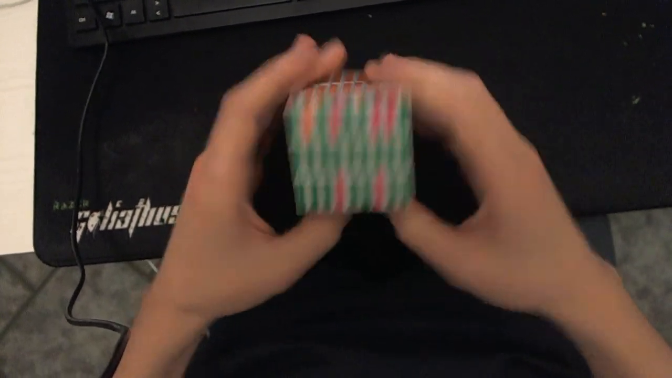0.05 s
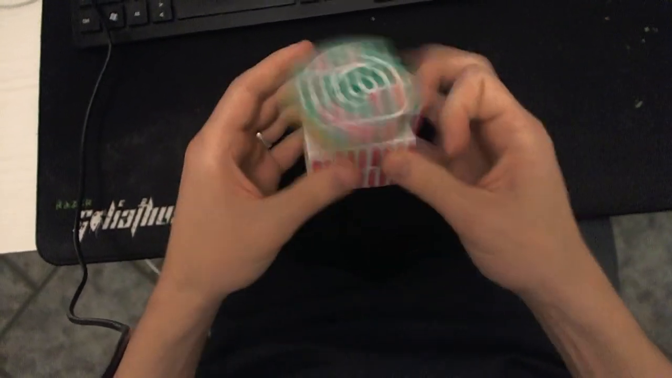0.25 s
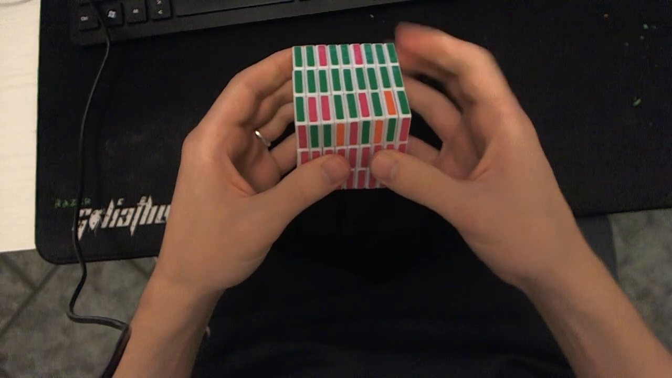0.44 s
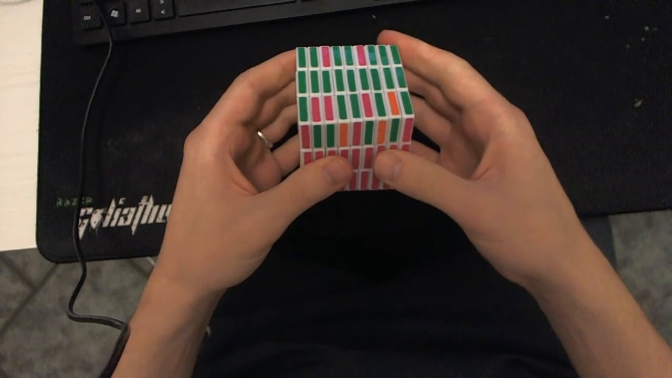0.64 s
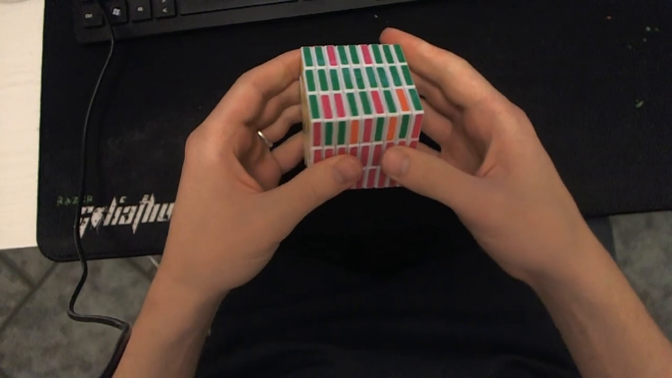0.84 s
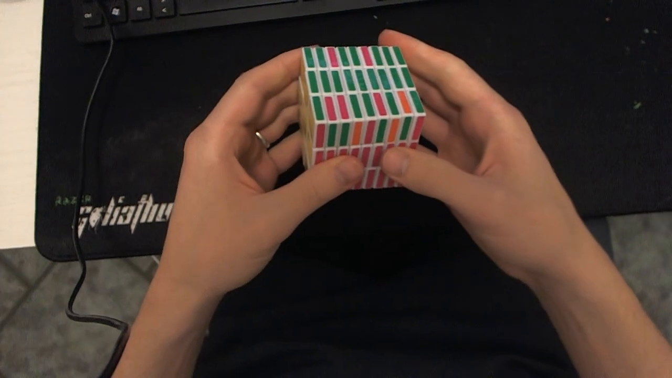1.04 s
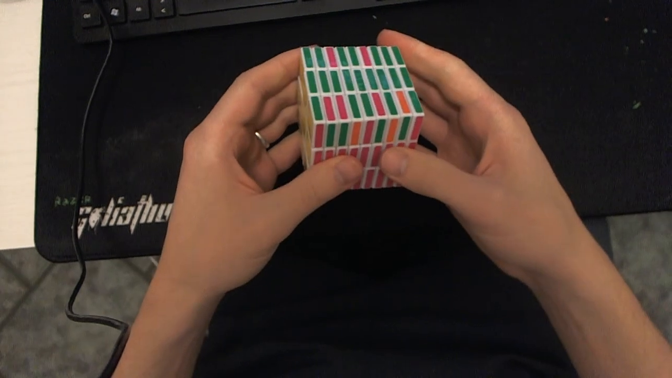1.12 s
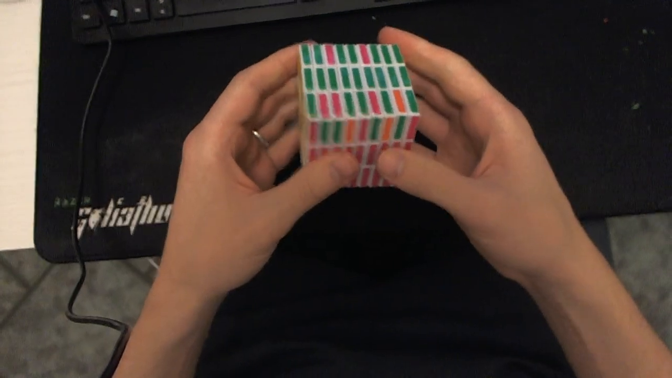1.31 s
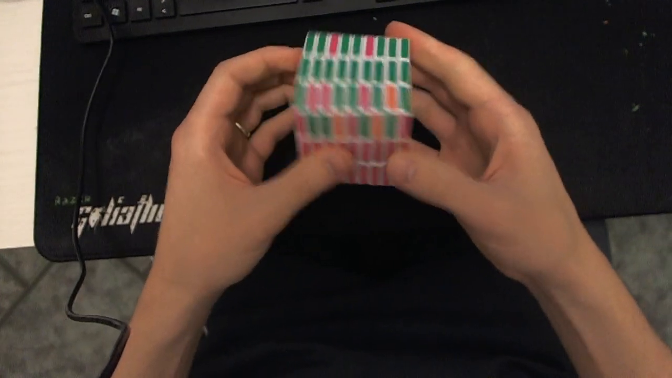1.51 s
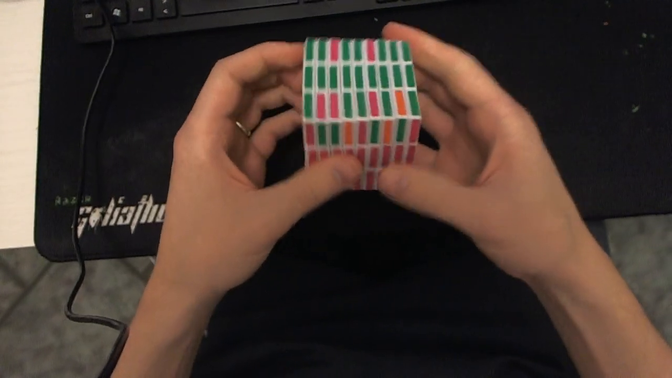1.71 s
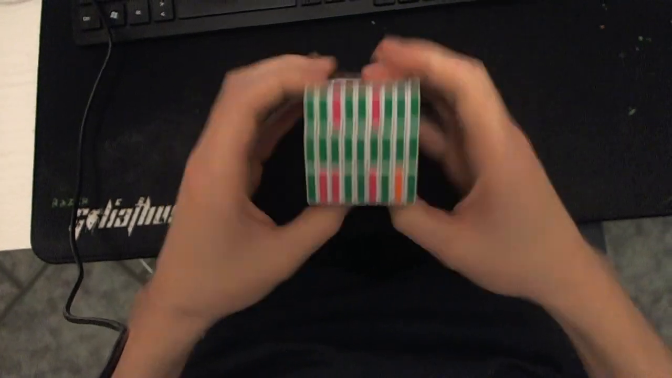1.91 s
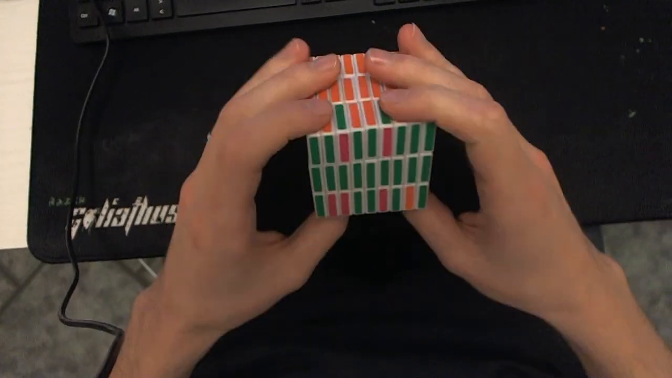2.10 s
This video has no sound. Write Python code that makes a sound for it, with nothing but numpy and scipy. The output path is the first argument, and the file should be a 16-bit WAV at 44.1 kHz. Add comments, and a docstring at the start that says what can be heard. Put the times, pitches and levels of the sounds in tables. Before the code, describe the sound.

A plastic twisty puzzle layer is flicked round with a loud clatter, then light ticks follow

```python
"""In a quiet room, a plastic twisty puzzle is turned by hand close to a pair of microphones in one place.
One layer is flicked round with a loud clatter of knocks, rattle and a low drone; then the pieces tick and rub
in two light runs as the puzzle is tipped and gripped again. A computer hums faintly behind.
Contacts are damped noise with a ring, rubbing is a shower of tiny slips, the computer is noise and sines;
a short room, a noise suppressor and a limiter follow."""
import sys
import numpy as np
from scipy import signal
from scipy.fft import rfft, irfft
from scipy.io import wavfile
from scipy.ndimage import uniform_filter1d, minimum_filter1d

SR = 44100
rng = np.random.default_rng(int(sys.argv[2]) if len(sys.argv) > 2 else 0)


def output_pcm(signal):
    """Save a mono or channel-first signal as 16-bit PCM at the path in sys.argv[1].

    Samples are clipped to [-1, 1] before scaling.
    """
    pcm = np.clip(np.atleast_2d(signal).T, -1, 1) * 32767
    wavfile.write(sys.argv[1], SR, np.round(pcm).astype(np.int16))


N = 97020

# All source levels are taken ahead of the suppressor and limiter.
LIKENESS = 1  # of left and right in the puzzle's own sounds: 1 is identical
CLICK_DB, CLACK_DB = -1.31, -1  # trims of the light ticks and of the turn's knocks
CLICK_DECAY_S, CLACK_DECAY_S, RISE_S = 0.0013, 0.0012, 0.00042  # time constants
CONTACT_PEAK_DB = 4.5  # each contact favours the band around its ring pitch
RING_DB, RING_CYCLES = -3.5, 3.6  # ring against crowd; cycles in which it falls to 1/e
HARD_DB, RING_GROWTH = -10, 0.7  # knocks above HARD_DB ring more: dB for each dB of strength
RATTLE_PER_S, RATTLE_SPREAD_DB = 850, 5.5  # mean rate of slips and spread of their sizes
SCRAPE_PEAK_DB, PEAK_OCTAVES = 11, 0.44  # pitch peak of a scrape; width of every peak
THUMP_S, THUMP_HZ, THUMP_DECAY_S, THUMP_DB = 0.2628, 350, 0.0018, -34.5
ROOM_DB, EARLY_DB = -16.5, -14  # energy of the tail and of the early cluster against a direct sound
EARLY_PEAK_S, EARLY_END_S = 0.0039, 0.033  # the early cluster is strongest, then begins its last drop
AIR_DB = -64.5
SUPPRESS_DB, OPEN_DB = 4.5, 19  # deepest cut; rise over the floor at which nothing is cut
CEILING, CUT_HZ = 0.88, 15800  # full scale is 1


def amp(db):
    """Turns decibels into an amplitude factor."""
    return 10 ** (np.asarray(db) / 20)


def evened(x):
    """Scales to rms 1."""
    return x / np.sqrt(np.mean(x ** 2) + 1e-20)


def read(points, hz):
    """Reads a table on a log-frequency axis."""
    f, value = np.transpose(points)
    return np.interp(np.log(hz + 1), np.log(f + 1), value)


def bump(hz, centre_hz):
    """A broad resonance of height 1 on a log-frequency axis."""
    return np.exp(-(np.log2((hz + 1) / centre_hz) / PEAK_OCTAVES) ** 2)


def add(mix, s, sound):
    """Mixes a stereo sound in at time s."""
    part = mix[:, max(round(s * SR), 0):][:, :sound.shape[1]]
    part += sound[:, :part.shape[1]]


def pair(a, b, likeness):
    """Two channels share a and take b with opposite signs, less of it the more alike they are."""
    c = np.clip(likeness, 0, 1)
    return np.sqrt((1 + c) / 2) * a + np.sqrt((1 - c) / 2) * np.array([b, -b])


def causal(db):
    """The sharpest causal (minimum-phase) pulse with these gains, faded out at its end."""
    log_gain = np.log(amp(np.concatenate([db, db[-2:0:-1]])))
    pulse = irfft(np.exp(np.conj(signal.hilbert(log_gain)))[:len(db)])
    return pulse * np.hanning(2 * len(pulse))[len(pulse):]


def background(likeness=0.81, waver_hz=2.0):
    """Computer: shaped noise for the fan air, and sines whose pitch wavers slowly for the hum."""
    # fan air: hz, gain_db
    air_colour = [(25, -30.5), (60, -21), (100, -7), (170, -1.5), (300, -3), (700, -5.5), (1000, -2),
                  (1400, -10.5), (2600, -12.5), (3500, -20), (5200, -19), (7500, -28), (11000, -30),
                  (15500, -41.5)]
    # hum partials: pitch_hz, rms level_db
    hum_partials = [(128, -67.5), (256, -78.5), (512, -75.5), (1020, -76)]
    noise = pair(*rng.standard_normal((2, N)), likeness)
    air_gain = amp(read(air_colour, np.fft.rfftfreq(N, 1 / SR)))
    out = amp(AIR_DB) * evened(irfft(rfft(noise) * air_gain, N))
    for hz, db in hum_partials:
        wander = evened(uniform_filter1d(rng.standard_normal(N), size=4000))
        # higher partials waver by more hertz
        drift_hz = waver_hz * np.sqrt(hz / hum_partials[0][0]) * wander
        phase = 2 * np.pi * np.cumsum(hz + drift_hz) / SR
        out = out + amp(db) * np.sqrt(2) * np.sin(phase)
    return out


def rattle(force, colour, peak_hz=1000, peak_db=0, size=2048):
    """Tiny random slips of plastic on plastic, as strong as the force, favouring one pitch."""
    spread = amp(RATTLE_SPREAD_DB * np.minimum(rng.exponential(1, N), 2))
    sizes = spread * (rng.random(N) < RATTLE_PER_S / SR)
    slips = pair(rng.choice([-1., 1.], N), rng.standard_normal(N), LIKENESS) * sizes
    hz = np.fft.rfftfreq(size, 1 / SR)
    pulse = causal(read(colour, hz) + peak_db * bump(hz, peak_hz))
    pulse = pulse[None] / np.linalg.norm(pulse)
    return signal.oaconvolve(evened(slips) * force, pulse, axes=1)[:, :N]


def contact(row, colour, decay_s, size=2048):
    """A piece is struck: a crowd of heavily damped modes, and one that stands out and rings."""
    # weight of a contact's body over frequency: hz, share
    body_share = [(700, 0.12), (1500, 0.99), (3000, 0)]
    # weight of its bright edge over frequency: hz, share
    edge_share = [(5500, 0.031), (8500, 0.98)]
    level_db, ring_hz, body_db, edge_db = row
    t, hz = np.arange(size) / SR, np.fft.rfftfreq(size, 1 / SR)
    rise = 1 - np.exp(-t / RISE_S)

    crowd = pair(*rng.standard_normal((2, size)), LIKENESS) * rise * np.exp(-t / decay_s)
    # the noise's own uneven spectrum is taken out, so that the colour holds
    lumps_db = 10 * np.log10(uniform_filter1d((abs(rfft(crowd)) ** 2).mean(0), size=61))
    gain_db = read(colour, hz) + body_db * read(body_share, hz) + edge_db * read(edge_share, hz)
    pulse = causal(gain_db + CONTACT_PEAK_DB * bump(hz, ring_hz) - lumps_db)
    crowd = signal.fftconvolve(crowd, pulse[None], axes=1)[:, :size]

    tone = np.sin(2 * np.pi * (ring_hz * t + rng.random()))
    motion = rise ** 3 * np.exp(-t * ring_hz / RING_CYCLES) * tone
    ring = np.gradient(np.gradient(motion))  # acceleration of the surface
    ring_db = RING_DB + RING_GROWTH * max(level_db - HARD_DB, 0)

    # the level is that of the whole energy packed into one millisecond
    millisecond = np.sqrt(SR / 1000 / size)
    return evened(evened(crowd) + amp(ring_db) * evened(ring)) * millisecond * amp(level_db)


def contacts(table, colour, decay_s):
    """Plays a table of contacts, each struck at its own time."""
    out = np.zeros((2, N))
    for s, *row in table:
        add(out, s, contact(row, colour, decay_s))
    return out


def handling():
    """Loose pieces tick and rub as the grip changes; each rub swells and fades as a half ellipse."""
    # pieces rubbing under the fingers: start_s, length_s, peak level_db, scrape pitch_hz
    rubs = [(.0, 0.057, -63, 4500), (0.052, 0.023, -54.5, 4600), (0.097, 0.019, -57, 6800),
            (0.46, 0.039, -63.5, 1510), (1.324, 0.043, -51, 3400), (1.366, 0.076, -57.5, 2757),
            (1.45, 0.0463, -54.5, 2540), (1.536, 0.0204, -61, 2470), (1.781, 0.027, -58, 2700),
            (1.872, 0.058, -49.5, 2570), (1.969, 0.059, -62, 6500), (2.134, 0.0321, -65, 4600)]
    # light ticks of single pieces: start_s, level_db before CLICK_DB, ring pitch_hz, body_db, edge_db
    ticks = [(0.0628, -34.5, 4040, -4, 4.5), (0.0662, -33.5, 4220, -6, -1.5), (0.1037, -50, 6260, 8, -2),
             (0.1084, -46.5, 2580, 9, -11), (0.1508, -42, 6910, 5, -30), (0.4335, -33.5, 10560, 3, 16),
             (0.4781, -42, 1487, 9, 9), (0.533, -43.5, 7893, 0.5, 17), (0.5886, -50, 4154, 10.5, -9),
             (1.3358, -36, 5990, -8, 9), (1.3398, -38.5, 6550, 8, -6.5), (1.3457, -34.5, 3020, 3, 0.5),
             (1.3521, -31, 3620, 0, -2), (1.3703, -43.5, 3420, -2.5, 0), (1.3741, -29, 6200, -6, 7.5),
             (1.3955, -31, 5800, -13, -2), (1.3979, -32, 5990, -6, 5), (1.417, -31, 3940, -3, -3),
             (1.4292, -57, 3990, 5, 4), (1.4562, -34.5, 8990, -10, 6), (1.4603, -40, 5500, 2, 2),
             (1.4723, -35, 3650, 3, 13.5), (1.4748, -35, 2585, -4, -3), (1.499, -49, 4940, 10, 11),
             (1.5428, -45, 1550, 9.5, -8.5), (1.7874, -38.5, 6240, 7, -2), (1.8514, -43.5, 6400, 7, 6),
             (1.8593, -26, 8220, -7.5, -3), (1.8618, -27.5, 4490, -13.5, 5), (1.8906, -34, 7560, 6.5, 4),
             (1.8925, -38, 3080, 1, -3), (1.9005, -38, 3204, 3, -19), (1.9062, -43, 7000, -1, 5),
             (1.9101, -39.5, 2365, -4, 6), (1.9215, -52, 2870, -1, -11), (1.9296, -39.5, 5450, -8, 1),
             (1.9623, -34.5, 4200, -29, 17), (1.9686, -30.5, 6090, -6, 11.5),
             (2.0195, -40.5, 7470, -2.5, 12), (2.1358, -47.5, 4570, 0.5, -1.5), (2.1515, -40, 4480, -17, 2)]
    # colour of ticks and rubs: hz, gain_db
    tick_colour = [(60, -69.5), (300, -38.5), (700, -24.5), (1300, 0), (2000, -3.5), (2700, -2), (6000, -1),
                   (9500, -9.5), (12500, -26.5), (15500, -52.5)]
    t = np.arange(N) / SR
    out = amp(CLICK_DB) * contacts(ticks, tick_colour, CLICK_DECAY_S)
    for s, length, db, hz in rubs:
        across = 2 * (t - s) / length - 1  # -1 to 1 over the rub
        force = amp(db) * np.sqrt(np.maximum(1 - across ** 2, 0))
        out += rattle(force, tick_colour, hz, SCRAPE_PEAK_DB)
    return out


def fast_turn():
    """The spinning layer knocks and rattles; the hollow puzzle drones under it and thumps once."""
    # force of the turn, as the level of its fine rattle: time_s, level_db
    turn_force = [(0.142, -70), (0.167, -45.5), (.19, -46), (.216, -45.5), (.236, -24.5), (0.267, -18.5),
                  (.281, -27.5), (0.306, -22.5), (.323, -25), (0.336, -31), (0.372, -51.5)]
    # pieces knocking past each other: start_s, level_db before CLACK_DB, ring pitch_hz, body_db, edge_db
    knock_rows = [(0.1659, -27, 6490, -3, -6.5), (0.1797, -33, 2960, 6.5, -10.5),
                  (0.1889, -34.5, 2240, 9.5, -0.5), (0.1952, -25.5, 7020, 2.5, 5.5),
                  (0.1972, -29, 6900, -3.5, 6.5), (0.2022, -28, 2822, 13, -1.5), (0.2233, -19, 2540, 7, -5),
                  (0.2313, -17, 6540, 8, 6), (0.235, -14, 3630, 3, 0.5), (0.2441, -11, 4830, -3, -10.5),
                  (0.2492, -10.5, 4250, -4.5, 5.5), (0.2522, -15, 3200, -7.5, 2.5),
                  (0.2591, -10.5, 4447, -0.5, 2.5), (0.2628, -6, 4600, -3.5, 0.5),
                  (0.2658, -2, 4515, -5, 3), (0.2685, -4, 4224, -4.5, 8), (0.2721, -10, 2404, -4, 5),
                  (0.275, -11, 6630, -3, -0.5), (0.283, -16.5, 2800, 0.5, 0.5), (0.2885, -12, 5257, -1, 0),
                  (0.297, -18, 2810, -1, -8.5), (0.3015, -17, 6800, 1, -5.5), (0.3055, -17, 5820, 4, 0.5),
                  (0.311, -14.5, 2659, -2, -5), (0.3195, -11.5, 2562, 0, 0.5), (0.3218, -13, 4614, -2, 1.5),
                  (0.3310, -15.5, 6233, -2, -0.5), (0.3418, -28, 4200, 0.5, -3.5)]
    # colour of knocks and fine rattle: hz, gain_db
    knock_colour = [(50, -81), (220, -54), (350, -38), (700, -15.5), (1000, -2.5), (1450, -1.5),
                    (1900, -10.5), (2600, 1.5), (3300, -6.5), (4500, -3), (7500, -6.5), (9600, -11.5),
                    (10800, -10), (12400, -23.5), (13500, -24), (15500, -44)]
    # low drone of the hollow puzzle: time_s, level_db
    drone_force = [(0.215, -75), (0.25, -48.5), (0.267, -29.5), (0.282, -47), (0.322, -46), (0.36, -70)]
    # colour of the drone: hz, gain_db
    drone_colour = [(50, -60), (230, -27), (340, -3.5), (600, 1), (4000, -55)]
    t = np.arange(N) / SR
    # silent outside each curve
    force = amp(np.interp(t, *np.transpose(turn_force), left=-np.inf, right=-np.inf))
    drone = amp(np.interp(t, *np.transpose(drone_force), left=-np.inf, right=-np.inf))
    # the hardest knock pushes the whole puzzle
    age = np.maximum(t - THUMP_S, 0)
    swell = age / (2 * THUMP_DECAY_S)
    envelope = (swell * np.exp(1 - swell)) ** 2
    thump = amp(THUMP_DB) * envelope * np.cos(2 * np.pi * THUMP_HZ * age)
    knocks = amp(CLACK_DB) * contacts(knock_rows, knock_colour, CLACK_DECAY_S)
    return knocks + rattle(force, knock_colour) + rattle(drone, drone_colour) + thump


def room(x, onset_s=0.0023, likeness=0.93, size=16384):
    """Close reflections from desk and hands, then a small room's tail that decays by frequency."""
    # decay of the room: hz, t60_s
    decay_t60 = [(300, 0.02), (1000, 0.1851), (2500, 0.1676), (5500, 0.2771), (9000, 0.23), (14000, 0.03)]
    # colour of the tail: hz, gain_db
    tail_colour = [(300, -1), (1100, 7.5), (3000, -2.5), (8000, -6), (14000, -1.5)]
    hz, t, z = signal.stft(pair(*rng.standard_normal((2, size)), likeness), SR, nperseg=256)
    fall_db = -60 * t / read(decay_t60, hz)[:, None]
    gain = amp(fall_db + read(tail_colour, hz)[:, None])
    tail = signal.istft(z * gain, SR)[1][:, :size]
    age = np.arange(size) / SR
    tail = tail * (1 - np.exp(-(age / onset_s) ** 2))

    early_times = [0, EARLY_PEAK_S, EARLY_END_S, EARLY_END_S + EARLY_PEAK_S]
    early_shape = np.interp(age, early_times, [0.66, 1, 0.66, 0.00031])
    early = pair(*rng.standard_normal((2, size)), likeness) * early_shape
    response = amp(ROOM_DB) * tail / np.linalg.norm(tail[0])
    response = response + amp(EARLY_DB) * early / np.linalg.norm(early[0])
    return signal.fftconvolve(x, response, axes=1)[:, :N]


def microphones(x):
    """Two microphones in one place: each has its own colour, half the lean up or down."""
    # balance of the two: hz, left_over_right_db
    balance = [(150, -1.5), (700, 4), (1300, 2), (1900, -0.5), (2700, -0.26), (3300, -4), (3980, -9),
               (4600, -1), (5100, 3), (6050, 3.5), (7000, 2.1), (7800, -3), (9000, 0.5)]
    lean = amp(read(balance, np.fft.rfftfreq(N, 1 / SR)) / 2)
    return irfft(rfft(x) * np.array([lean, 1 / lean]), N)


def suppress(x, size=256):
    """Noise suppressor: turns down bands that are near their floor, which cuts the tails short."""
    z = signal.stft(x, nperseg=size)[2]
    power = (abs(z) ** 2).mean(0)
    power = uniform_filter1d(uniform_filter1d(power, 10, axis=0), 2, axis=1)
    power_db = 10 * np.log10(power.clip(1e-20))
    over_db = power_db - np.percentile(power_db, 20, axis=1, keepdims=True)
    # the cut eases off over the last 10 dB below OPEN_DB
    closed = np.clip((OPEN_DB - over_db) / 10, 0, 1)
    return signal.istft(z * amp(-SUPPRESS_DB * closed))[1][:, :N]


def scene():
    """The puzzle in its room, over the computer's hum."""
    puzzle = handling() + fast_turn()
    return microphones(puzzle + room(puzzle)) + background()


def record(dry, size=129):
    """Noise suppressor; a quick limiter turns down peaks above the ceiling; then the band limit."""
    dry = suppress(dry)
    headroom = np.minimum(CEILING / (abs(dry).max(0) + 1e-9), 1)
    lowest = minimum_filter1d(headroom, size)
    gain = uniform_filter1d(uniform_filter1d(lowest, size // 2), size // 2)
    lowpass = signal.firwin(511, CUT_HZ, window=("kaiser", 9), fs=SR)
    return signal.oaconvolve(dry * gain, lowpass[None], "same", axes=1)


dry = scene()
out = record(dry)
output_pcm(out)
```